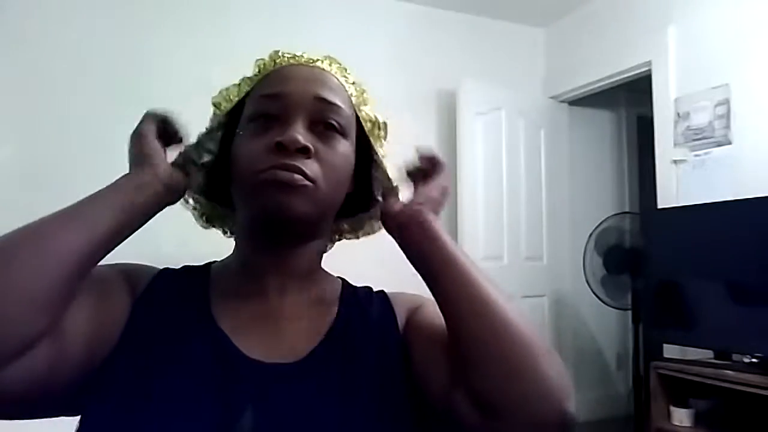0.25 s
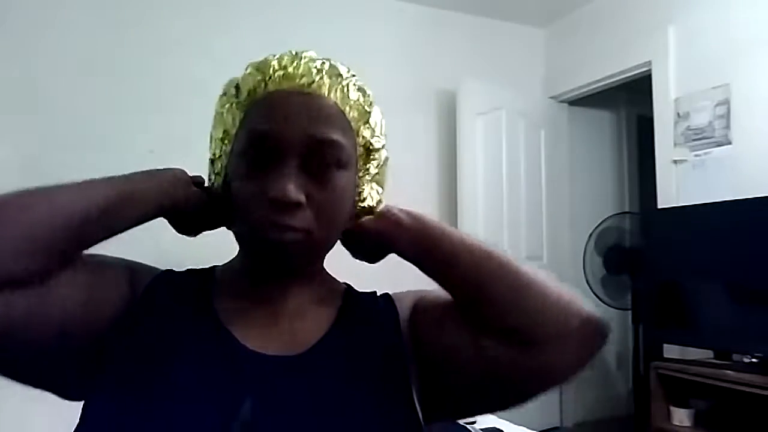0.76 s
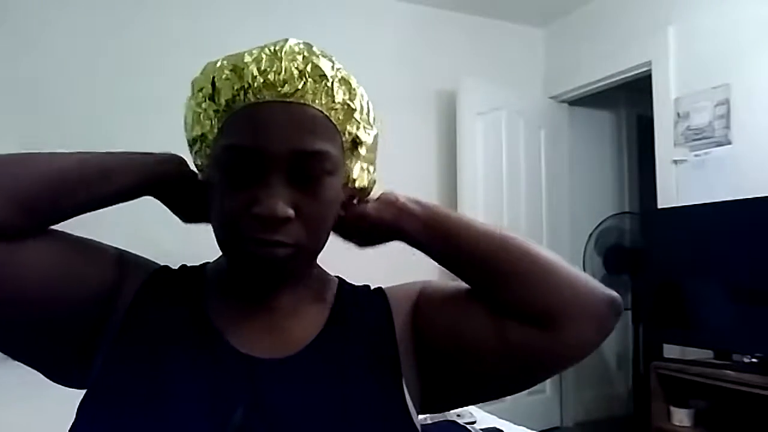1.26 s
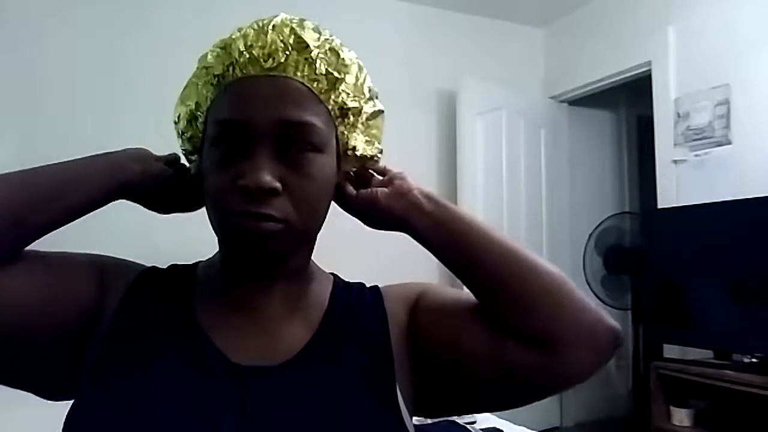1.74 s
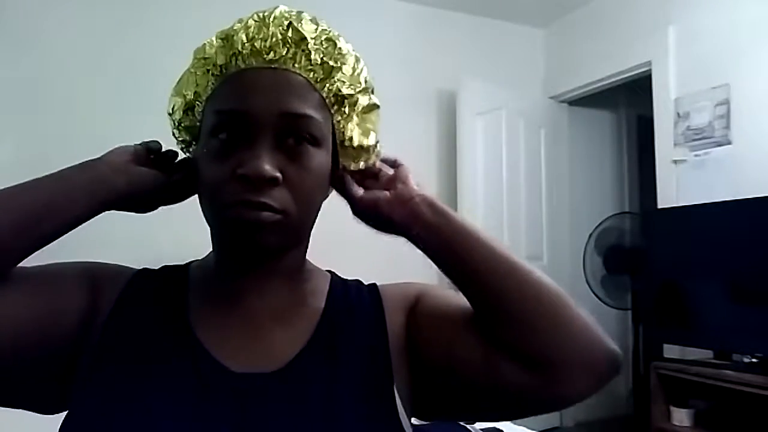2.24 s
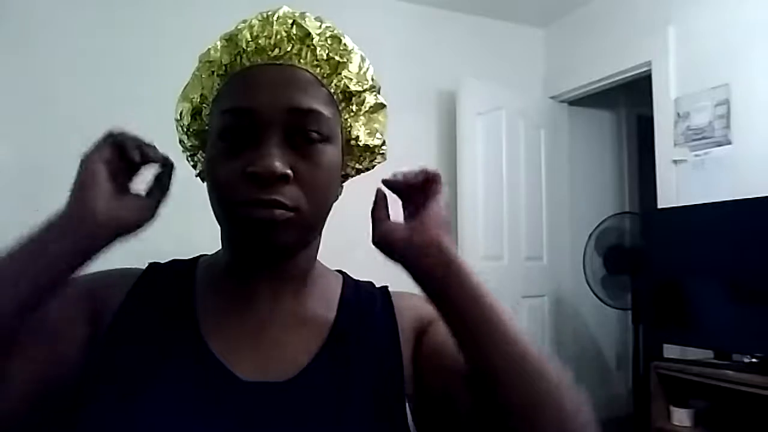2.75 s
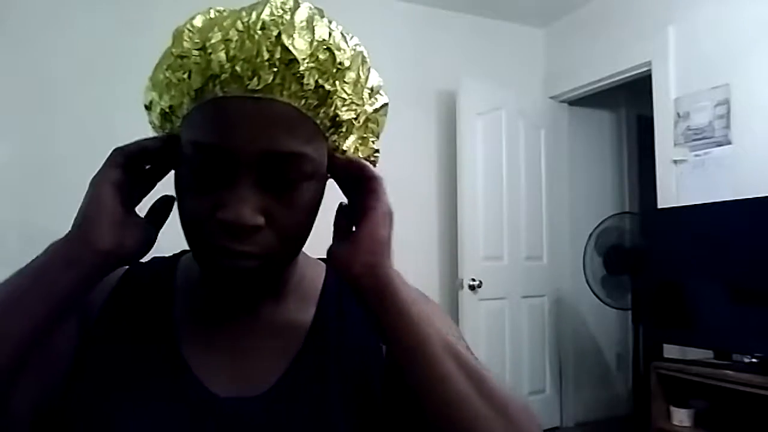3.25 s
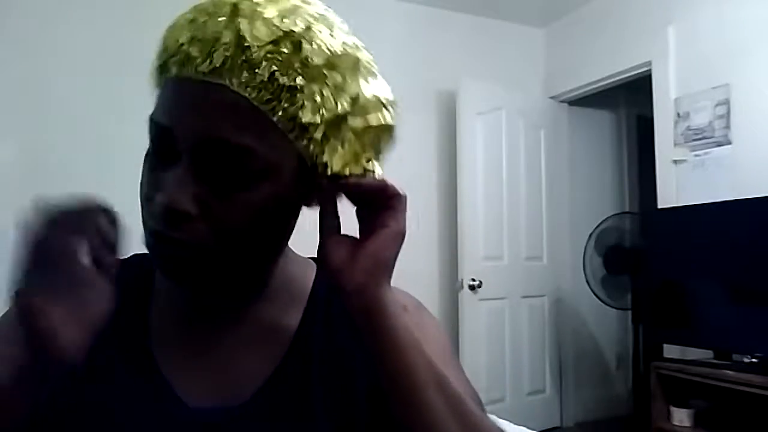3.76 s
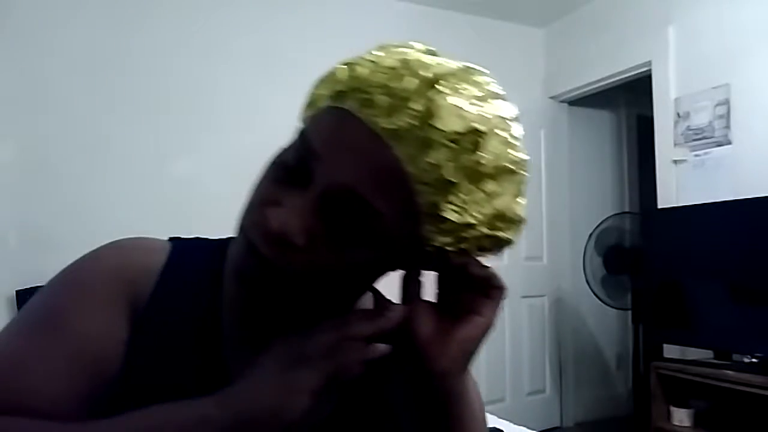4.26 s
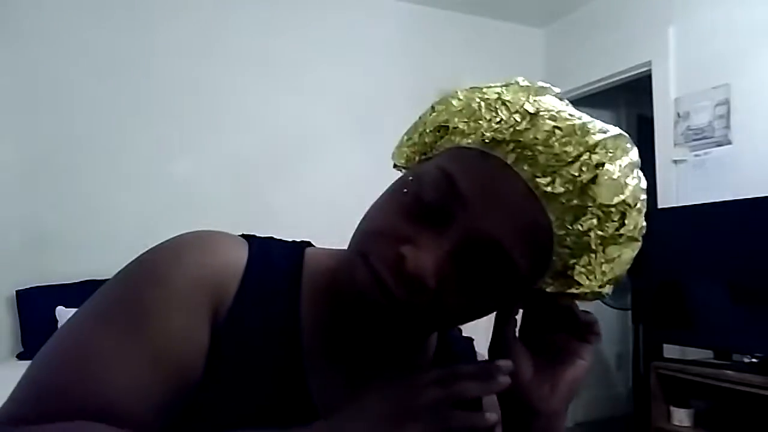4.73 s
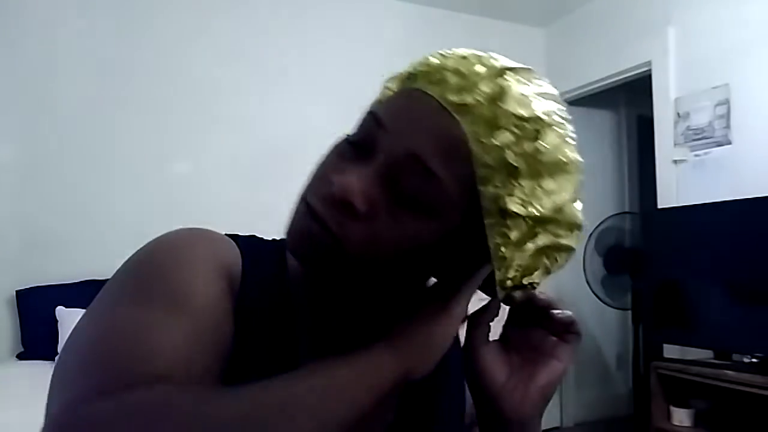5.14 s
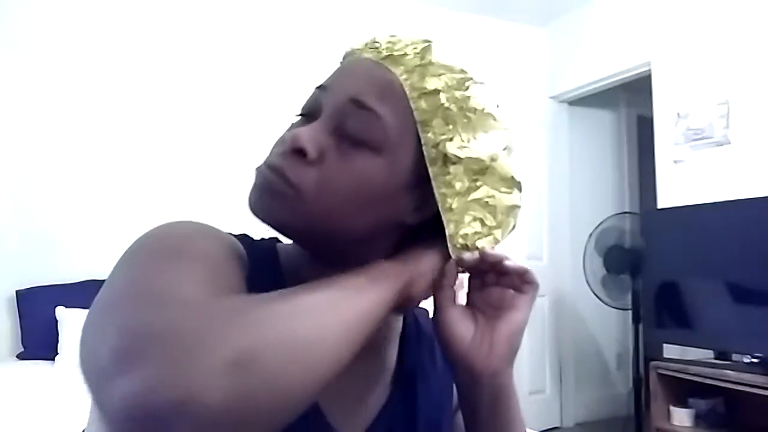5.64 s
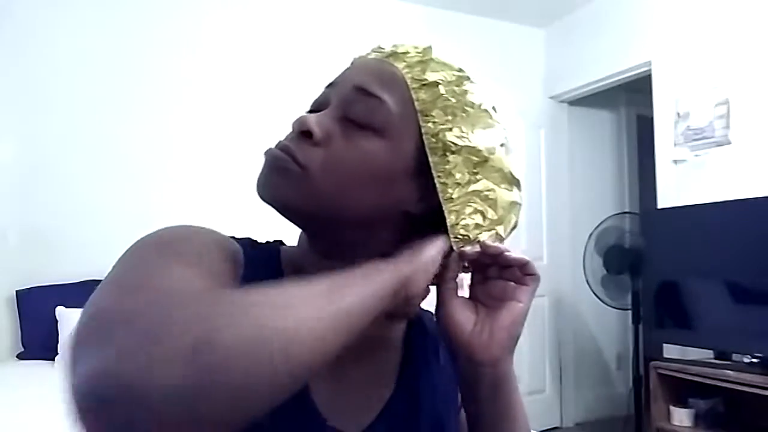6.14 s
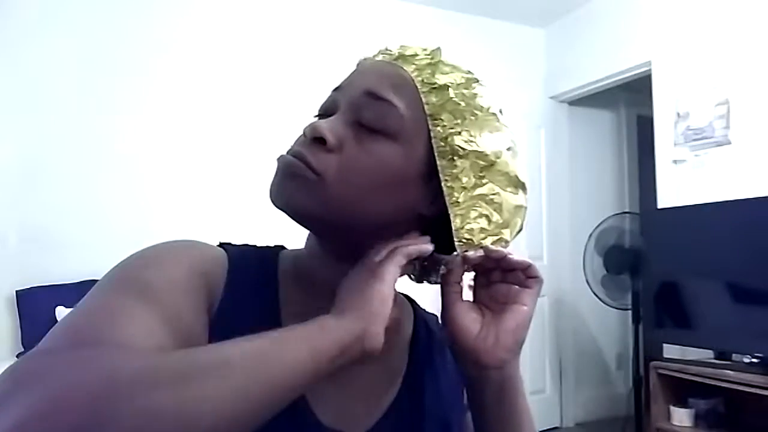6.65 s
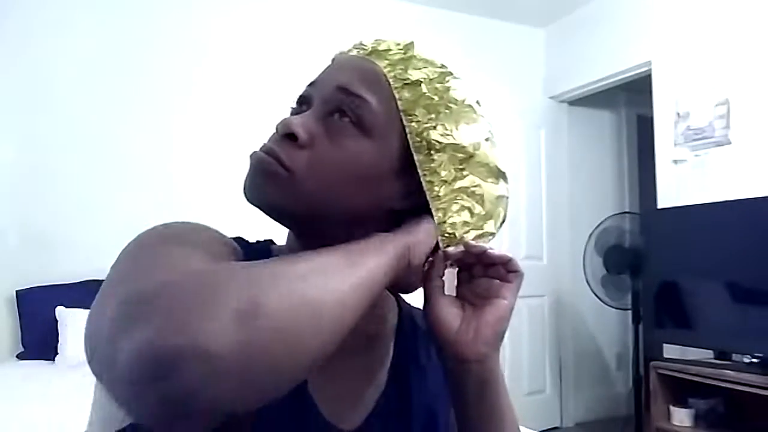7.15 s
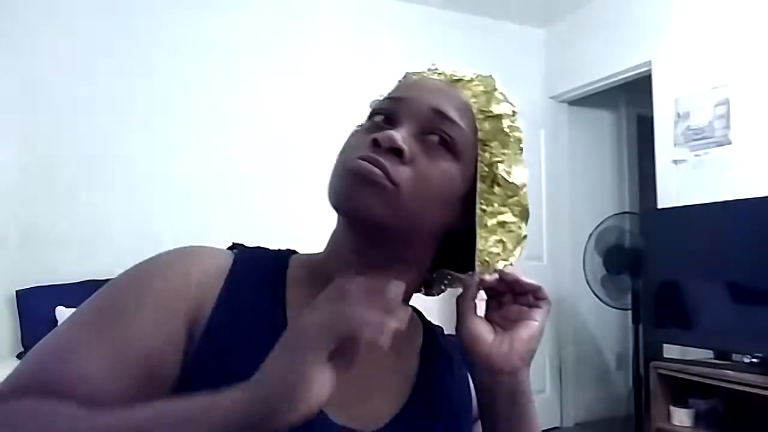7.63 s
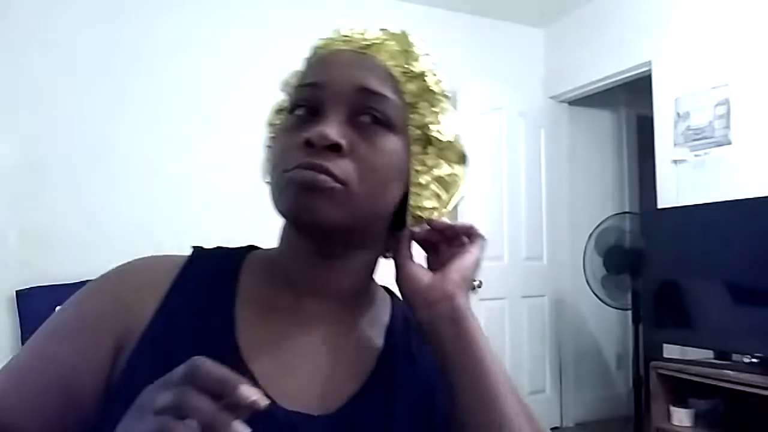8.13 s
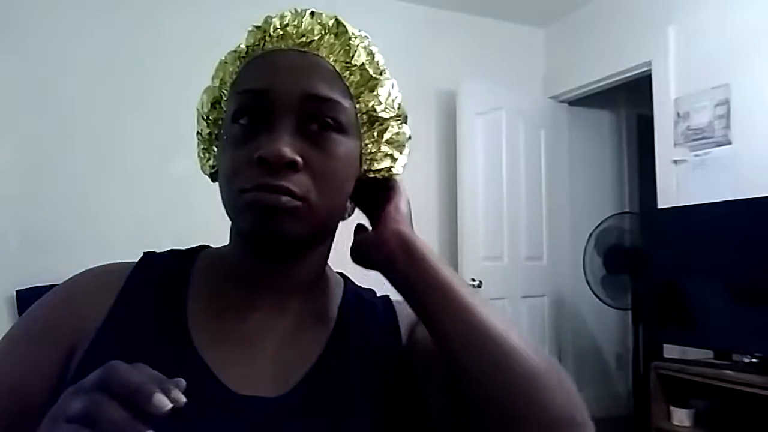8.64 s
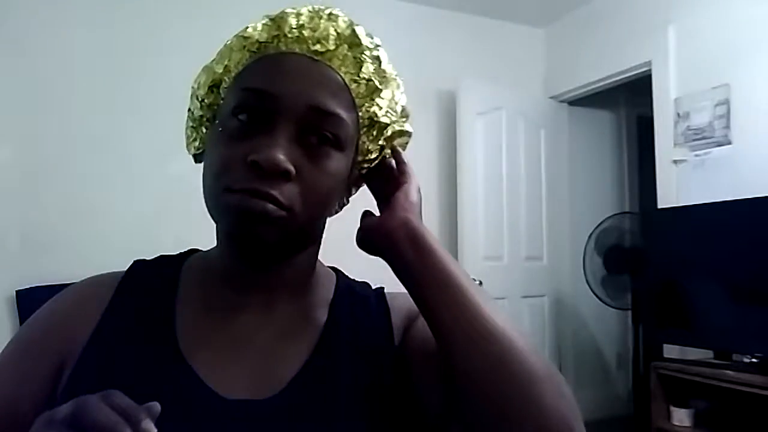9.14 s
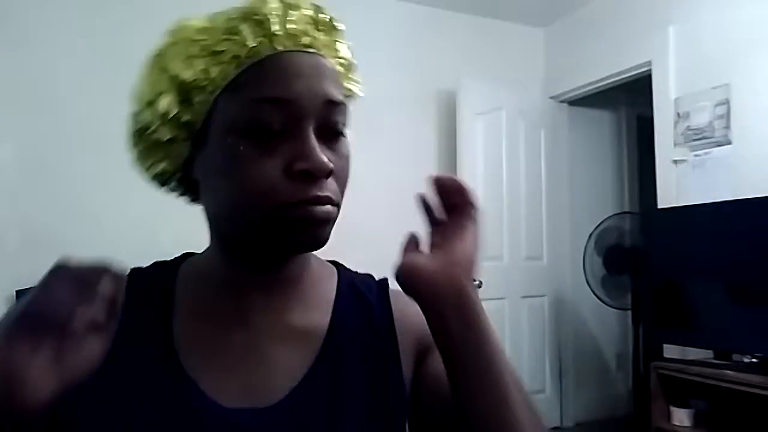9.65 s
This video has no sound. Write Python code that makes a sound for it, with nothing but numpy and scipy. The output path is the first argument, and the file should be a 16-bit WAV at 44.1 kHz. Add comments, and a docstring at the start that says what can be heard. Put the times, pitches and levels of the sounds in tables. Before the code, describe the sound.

Very close, bright crinkling of a foil-like cap in a small quiet bedroom. Dense rustling opens, thins to scattered ticks and almost stops, then single snaps return. A sharp loud crackle bursts midway, followed by sparse small ticks, a soft elastic slap and a last busy run of crunches. Dull rubbing of hair and skin, low rumble and faint hiss lie beneath.

```python
"""In a quiet bedroom, hands press and tuck a crinkly foil cap over hair, close to two microphones.
Creases buckle in swarms of tiny ticks and single sharp snaps, each a shaped burst of noise.
Film and fingers rub over hair as coloured noise; fingertips click, and the elastic hem slaps the skin as decaying tones.
A short room tail follows the handling, over a low rumble, a low hum, two thin whines and faint hiss."""
import sys
import numpy as np
from scipy import signal
from scipy.fft import rfft, irfft, next_fast_len
from scipy.io import wavfile
from scipy.ndimage import uniform_filter1d, map_coordinates

SR = 44100
rng = np.random.default_rng(int(sys.argv[2]) if len(sys.argv) > 2 else 0)


def master_out(mix):
    """Clip the mix to full scale and print it as 16-bit PCM to the path in sys.argv[1]."""
    frames = np.transpose(np.atleast_2d(mix))
    ceiling = np.clip(frames, -1, 1)
    pcm = np.round(ceiling * 32767).astype(np.int16)
    wavfile.write(sys.argv[1], SR, pcm)


N = 436149

# Tone colour of a buckling crease: (pitch_hz, relative level_db)
CREASE_COLOUR = [(300, -77.5), (1500, -54.5), (4000, -22), (5500, -21), (7800, -14), (8800, -11),
                 (11000, -6), (12400, 2.5), (13100, -5), (13700, -3), (14600, -10), (16000, -10.5)]
# Tone colour of film sliding over hair: (pitch_hz, relative level_db)
SLIDE_COLOUR = [(150, -11.5), (550, -13.5), (950, -0.5), (1400, -4), (2000, 0.5), (3300, 0.5), (4300, -5),
                (5400, -1), (7500, -11), (10000, -30), (16000, -43)]
# Dull tone colour of rubbed hair and skin: (pitch_hz, relative level_db)
HAIR_COLOUR = [(30, -43), (80, 9), (180, 1.5), (350, 4), (550, -0.5), (900, -3), (1400, -12.5), (2200, -12),
               (6000, -39)]


def amp(db):
    """Turn decibels into a gain."""
    return 10 ** (np.asarray(db) / 20)


def unit(x):
    """Scale x to an rms level of 1."""
    return x / np.sqrt(np.mean(x ** 2) + 1e-20)


def read_curve(points, hz):
    """Read a (pitch, value) table at any pitch, with pitch on a log axis."""
    point_hz, value = np.transpose(points)
    return np.interp(np.log(hz + 1), np.log(point_hz), value)


def filtered(x, response):
    """Multiply the spectrum of x by a response that depends on pitch."""
    size = next_fast_len(N + SR // 2)
    hz = np.fft.rfftfreq(size, 1 / SR)
    return irfft(rfft(x, size) * response(hz), size)[..., :N]


def noise(colour, alike):
    """Coloured stereo noise of rms 1; alike is the left-right correlation, from -1 to 1."""
    turn = np.arccos(np.clip(alike, -1, 1)) / 2
    mid, side = filtered(rng.standard_normal((2, N)), lambda hz: amp(read_curve(colour, hz)))
    left = np.cos(turn) * mid + np.sin(turn) * side
    right = np.cos(turn) * mid - np.sin(turn) * side
    return unit(np.array([left, right]))


def wobble(count):
    """A smooth random curve with count random points a second."""
    points = rng.standard_normal(N * count // SR + 4)
    return map_coordinates(points, [np.arange(N) * count / SR])


def gestures(start_s, length_s, level_db, attack_share, release_s):
    """Level in dB of hand movements: each builds up (the longer, the slower), holds and lets go."""
    power = np.full(N, 1e-10)  # a floor at -100 dB
    for start, held, level in zip(start_s, length_s, level_db):
        first = max(int(start * SR), 0)
        last = min(int((start + held + 6 * release_s) * SR), N)
        span = np.arange(first, last)
        t = span / SR - start
        build_up = np.clip(t / (attack_share * held), 0, 1)
        let_go = np.exp(-np.maximum(t - held, 0) / release_s)
        power[span] += (amp(level) * build_up * let_go) ** 2
    return 10 * np.log10(power)


def placed(start_s, gain, ticks):
    """Add up stereo ticks, each at its own start time and gain."""
    first = np.round(start_s * SR).astype(int)[:, None]
    index = np.maximum(first + np.arange(ticks.shape[2]), 0).ravel()
    sides = ticks.swapaxes(0, 1)
    return np.array([np.bincount(index, (gain[:, None] * side).ravel(), N)[:N] for side in sides])


def creases(count, colour, burst_s, flutter_db, ring_db, fold_hz=None):
    """Stereo ticks of unit energy: a click, its near echo, then wrinkle flutter, each with its own ringing."""
    size = 640  # samples in a tick
    t, hz = np.arange(size) / SR, np.fft.rfftfreq(size, 1 / SR)
    echo_s, echo_db = 0.0012, -5  # the bounce off the nearest surface
    click = np.exp(-t / 0.0003)
    echo = amp(echo_db) * np.exp(-((t - echo_s) / (burst_s / 2)) ** 2)
    flutter = amp(flutter_db - 60 * t / 0.042)
    shape = click + echo + flutter
    # random bumps in the spectrum: every facet rings at its own pitches
    facets = signal.resample(rng.standard_normal((count, 1, 28)), len(hz), axis=2)
    colour_db = read_curve(colour, hz) + ring_db * facets
    if fold_hz is not None:
        fold_ring_db, half_width_hz = 6, 650  # the fold's own resonance
        distance = (hz - fold_hz[:, None, None]) / half_width_hz
        colour_db = colour_db + fold_ring_db / (1 + distance ** 2)
    # minimum phase: the film rings only after it has buckled
    causal = np.r_[1, np.full(size // 2 - 1, 2), 1, np.zeros(size // 2 - 1)]
    cepstrum = irfft(np.log(amp(colour_db))) * causal
    bursts = rng.standard_normal((count, 2, size)) * shape
    ticks = irfft(rfft(bursts) * np.exp(rfft(cepstrum)))
    return ticks / np.sqrt(np.sum(ticks ** 2, axis=2, keepdims=True))


def swarm(level_db, rate, spread_db, colour, burst_s, ring_db):
    """Random ticks of unequal size, rate a second, that together follow an rms level."""
    due = np.cumsum(rate) / SR  # how many ticks should have sounded by now
    count = int(due[-1])
    chance = rng.random((count, 2))
    turn = np.minimum(np.arange(count) + 2 * chance[:, 0], count - 1)
    at = np.searchsorted(due, turn)
    # many small ticks and a few large ones
    size_db = spread_db * np.minimum(-np.log(1 - chance[:, 1]), 3)
    # where ticks are rarer, each carries more of the level
    gain = amp(level_db[at]) * unit(amp(size_db)) * np.sqrt(SR / rate[at])
    ticks = creases(count, colour, burst_s, flutter_db=-22, ring_db=ring_db)
    return placed(at / SR, gain, ticks)


def background():
    """Low rumble swells and sinks unevenly, mostly opposite at the two microphones, under faint room hiss."""
    # Rumble level: (time_s, level_db before a small random wobble)
    rumble_levels = [(0, -56), (0.2, -51), (0.75, -60.5), (1.15, -58.5), (1.5, -54.5), (2.1, -58),
                     (2.5, -60.5), (2.8, -69), (3.15, -68), (3.4, -53.5), (3.8, -62.5), (4.4, -56),
                     (5.3, -56), (5.9, -56), (6.1, -60.5), (6.5, -57.5), (6.88, -64.5), (7.2, -57.5),
                     (7.8, -58.5), (8.2, -55), (8.55, -60.5), (8.9, -65), (9.89, -53.5)]
    # Tone colour of the rumble: (pitch_hz, relative level_db)
    rumble_colour = [(20, -40.5), (33, -23), (42, -2), (55, 5), (80, -2), (140, -8), (250, -16),
                     (400, -21.5), (700, -59.5), (2000, -83.5), (8000, -60.5)]
    # Tone colour of the room hiss: (pitch_hz, relative level_db)
    hiss_colour = [(200, 13.5), (1000, -4), (2000, -18), (7000, -17), (10500, -1), (12400, 3.5),
                   (14000, -2), (16000, -13)]
    time_s, level_db = np.transpose(rumble_levels)
    rumble_db = np.interp(np.arange(N) / SR, time_s, level_db)
    rumble = noise(rumble_colour, alike=-0.85)
    swelling = amp(rumble_db + 1.5 * wobble(count=9)) * rumble
    return swelling + amp(-68.5) * noise(hiss_colour, alike=0)


def circuits():
    """The electronics add steady sine tones (a low hum and two thin whines) and an even hiss."""
    # Steady tones: (pitch_hz, left level_db, right level_db), as rms levels
    steady_tones = [(52.5, -81, -67.5), (4130, -87.5, -88), (14000, -85, -75.5)]
    t = np.arange(N) / SR
    side_phase = np.array([[0], [2.45]])  # radians, left and right
    out = amp(-72) * rng.standard_normal((2, N))
    for hz, left_db, right_db in steady_tones:
        level = amp([[left_db], [right_db]]) * np.sqrt(2)  # rms to peak
        out += level * np.sin(2 * np.pi * hz * t + side_phase)
    return out


def brush():
    """Fingers and arms rub hair and skin: soft, dull noise whose grip varies unevenly."""
    # Brushing movements: (start_s, length_s, level_db)
    brush_moves = [(-0.05, 0.19, -62.5), (0.17, 0.3, -58.5), (0.497, 0.39, -65.5), (0.753, 0.24, -61),
                   (1.03, 0.15, -58.5), (1.3, 0.34, -59), (2.011, 0.13, -61), (2.286, 0.12, -65.5),
                   (2.451, 0.11, -60), (2.556, 0.27, -70), (2.8, 0.54, -70.5), (3.267, 0.32, -63),
                   (3.829, 0.16, -64.5), (4.133, 0.23, -68), (4.503, 0.16, -71.5), (4.802, 0.1, -64.5),
                   (4.948, 0.23, -67.5), (5.217, .34, -61), (5.659, .15, -61.5), (5.838, 0.13, -66.5),
                   (6.136, 0.19, -61.5), (6.5, 0.22, -63.5), (7.017, 0.23, -66), (7.326, .14, -62.5),
                   (7.6, .17, -62.5), (7.877, 0.21, -67.5), (8.178, 0.25, -62.5), (8.65, 0.14, -60.5),
                   (8.89, 0.16, -58.5), (9.19, 0.14, -64), (9.462, 0.17, -64), (9.714, 0.18, -68)]
    level_db = gestures(*np.transpose(brush_moves), attack_share=0.17, release_s=0.091)
    grip = amp(3 * wobble(count=60))
    return amp(level_db) * unit(grip * noise(HAIR_COLOUR, alike=-0.13))


def folds(x, depth_db):
    """Air pockets under the film change shape, so narrow resonances come and go."""
    spectrum = signal.stft(x, nperseg=1024)[2]
    field = rng.standard_normal(spectrum.shape[1:])
    field = uniform_filter1d(field, size=7, axis=0)  # smooth over pitch
    field = uniform_filter1d(field, size=4, axis=1)  # smooth over time
    gain = unit(amp(depth_db * unit(field)))
    return signal.istft(spectrum * gain, nperseg=1024)[1][:, :N]


def crinkle():
    """Harder pressing buckles more creases a second; sliding film catches in duller ticks over a soft rasp."""
    # Presses, tucks and tugs at the cap: (start_s, length_s, crinkling level_db, sliding level_db),
    # both levels before the random give
    tuck_moves = [(-0.02, 0.1, -45, -63), (0.149, 0.13, -40.5, -56), (0.298, 0.061, -36.5, -48),
                  (0.373, 0.22, -35.5, -53.5), (0.577, .13, -33, -48.5), (0.719, 0.24, -34.5, -50),
                  (.945, 0.19, -41, -56.5), (1.15, 0.24, -49.5, -64), (1.349, 0.096, -38, -50.5),
                  (1.456, 0.093, -41, -56), (1.605, 0.099, -41, -55.5), (1.771, 0.057, -45, -66),
                  (1.884, 0.019, -34, -54), (2.028, 0.093, -43.5, -56), (2.134, 0.12, -48.5, -65),
                  (2.295, 0.11, -53, -67), (2.47, 0.038, -46, -70), (2.509, 0.031, -45.5, -59.5),
                  (2.565, 0.058, -48, -66), (2.764, 0.028, -60, -69.5), (3.287, 0.053, -55.5, -61),
                  (3.338, 0.29, -56, -66), (3.847, 0.14, -44.5, -57), (4.016, 0.12, -48.5, -63),
                  (4.217, 0.028, -43.5, -57), (4.286, 0.2, -64, -76), (4.478, 0.17, -64, -69.5),
                  (4.805, 0.068, -54, -61), (5.137, 0.23, -60, -67), (5.374, 0.16, -36, -47.5),
                  (5.631, 0.13, -61, -68), (5.727, 0.2, -49.5, -62.5), (6.172, 0.2, -57, -66.5),
                  (6.362, .1, -46, -54), (6.522, .15, -49.5, -58), (6.795, 0.023, -55, -75),
                  (7.005, 0.083, -56, -66.5), (7.08, 0.097, -51.5, -59), (7.212, 0.062, -62.5, -74),
                  (7.33, 0.13, -51, -60.5), (7.501, 0.21, -64, -75), (7.714, 0.057, -45.5, -55),
                  (7.798, 0.14, -40, -53.5), (8.039, 0.12, -63.5, -72.5), (8.176, 0.16, -54.5, -66.5),
                  (8.631, 0.071, -52, -69.5), (8.687, 0.079, -35.5, -53), (8.801, 0.16, -40.5, -55),
                  (8.962, 0.15, -40, -52), (9.119, 0.064, -46.5, -59), (9.21, 0.12, -46, -56.5),
                  (9.42, 0.1, -55.5, -67.5), (9.533, 0.085, -38, -51.5), (9.772, 0.14, -55, -70.5)]
    start_s, length_s, *levels = np.transpose(tuck_moves)
    crinkle_db, slide_db = (
        gestures(start_s, length_s, db, attack_share=0.2, release_s=0.02) for db in levels)
    # the film sticks and gives, so ticks arrive in clumps
    give = wobble(count=45)
    bright_db = crinkle_db + 1.7 * give
    catch_db = slide_db + 1.2 * give + 1.5 * wobble(count=40)
    # ticks a second grow with the level
    bright_rate = 440 * amp(0.55 * np.clip(bright_db + 41.5, -25, 9))
    catch_rate = 380 * amp(0.55 * np.clip(catch_db + 52, -20, 8))
    bright = swarm(bright_db, bright_rate, spread_db=3.8, colour=CREASE_COLOUR, burst_s=0.0008, ring_db=3)
    catches = swarm(catch_db, catch_rate, spread_db=3.2, colour=SLIDE_COLOUR, burst_s=0.0016, ring_db=6)
    # a soft rasp lies under each kind of tick
    bright += amp(bright_db - 11) * folds(noise(CREASE_COLOUR, alike=0), depth_db=3)
    catches += amp(catch_db - 7) * folds(noise(SLIDE_COLOUR, alike=0), depth_db=3.5)
    return bright + catches


def desk(x):
    """A bounce off the desk combs the sound; its delay drifts slowly."""
    delay_s, drift_s, bounce_db = 0.00075, 0.00012, -9
    at = np.arange(N) - SR * (delay_s + drift_s * wobble(count=2))
    bounce = np.array([map_coordinates(side, [at]) for side in x])
    return (x + amp(bounce_db) * bounce) / np.sqrt(1 + amp(bounce_db) ** 2)


def bedroom(x, wet_db):
    """Walls send both sides of the cap to each microphone in a diffuse tail of decaying noise."""
    # How long the room rings: (pitch_hz, time to fall by 60 dB in s)
    room_decay = [(200, 0.11), (1500, 0.39), (5000, 0.36), (12000, 0.31), (16000, 0.063)]
    step = SR // 8  # the tail is drawn afresh eight times a second
    out = np.zeros((2, N + SR))
    for start in range(0, N, step):
        hz, t, spectrum = signal.stft(rng.standard_normal((2, 2, SR // 2)), SR, nperseg=256)
        build_up = 1 - np.exp(-t / 0.005)
        decay = amp(-60 * t / read_curve(room_decay, hz)[:, None])
        tail = signal.istft(spectrum * decay * build_up, SR, nperseg=256)[1]
        tail = tail / np.linalg.norm(tail[0])
        piece = x[None, :, start:start + step]
        answer = signal.fftconvolve(piece, tail, axes=2).sum(axis=1)
        out[:, start:start + answer.shape[1]] += answer
    return amp(wet_db) * out[:, :N]


def snaps():
    """Large creases flip at once, ring with their fold, and set off two neighbouring wrinkles each."""
    # Louder creases snapping through: (start_s, crack level_db,
    # fold body level_db relative to the crack, fold pitch_hz)
    snap_events = [(0.072, -35.5, -5.5, 6800), (0.1202, -33, -19, 1300), (0.148, -29.5, -19, 7100),
                   (0.176, -24.5, -9, 5600), (0.346, -22, -18.5, 2700), (0.4755, -31.5, -7, 2100),
                   (0.5249, -29, -10, 2299), (0.5652, -30.5, -21, 3000), (0.6067, -26.5, -26, 2700),
                   (0.6295, -29.5, -29, 2500), (0.6507, -26, -24, 2600), (0.6673, -23, -25, 2700),
                   (0.732, -23.5, -27.5, 2600), (0.803, -26.5, -37.0, 1300), (0.8322, -21.5, -24, 2307),
                   (1.036, -35.5, -6, 1500), (1.0673, -32.5, -32, 3002), (1.0769, -38, -24, 3000),
                   (1.1545, -29, -11, 3800), (1.27, -34.5, -28, 7500), (1.2996, -30, -27, 5490),
                   (1.3347, -30, -23, 1302), (1.5794, -25.5, -11.5, 6200), (1.6291, -21.5, -12, 5070),
                   (1.6768, -34.5, -16, 5195), (1.7192, -27, -10.5, 5270), (1.7655, -28.5, -34.5, 1801),
                   (1.7927, -24.5, -23, 6240), (1.8689, -33, -11, 6810), (1.8767, -29.5, -33, 7300),
                   (1.89, -26.5, -18, 5196), (1.894, -26, -18, 7800), (1.918, -29, -11.5, 5300),
                   (1.944, -27, -18, 5990), (1.9769, -24.5, -16, 5910), (2.0751, -30, -6.5, 5206),
                   (2.0992, -32, -20, 1302), (2.169, -33.5, -7, 4900), (2.2579, -35.5, -13.5, 6760),
                   (2.2865, -30, -13.5, 5100), (2.3194, -29, -30.0, 7640), (2.4737, -33, -25, 5196),
                   (2.5211, -26, -35, 7470), (2.5926, -45, -26, 5505), (2.981, -34, -41, 1398),
                   (3.3044, -40, -4, 1305), (3.7962, -40.5, -32.5, 7780), (3.843, -38.5, -12, 2996),
                   (3.847, -24, -18, 1599), (3.8839, -19, -14, 1700), (3.9279, -24, -16.0, 5363),
                   (3.9363, -29.5, -6, 3990), (3.9822, -24, -15, 7800), (3.991, -29.5, -8, 2312),
                   (4.0164, -31, -4, 7700), (4.0342, -24, -9, 5594), (4.0518, -24.5, -15, 1502),
                   (4.0945, -26, -16, 1498), (4.1174, -24.5, -12, 7034), (4.23, -28.5, -6, 7030),
                   (4.3185, -35, -14, 7850), (4.3313, -37.5, -20, 6000), (4.405, -30, -40, 2585),
                   (4.4872, -44, -5, 3317), (4.5113, -30.5, -3, 4000), (4.5331, -38, -18, 1894),
                   (4.6223, -29.5, -34, 5720), (4.709, -38.5, -18, 5920), (4.7393, -34, -23, 6430),
                   (4.7966, -27.5, -18, 5760), (4.8024, -34.5, -13.5, 3000), (4.8124, -27.5, -14, 4300),
                   (4.8265, -40, -10, 2400), (4.8512, -28.5, -21, 5540), (4.8848, -39, -7.5, 6310),
                   (4.918, -21, -15, 7890), (4.9885, -32.5, -8, 5940), (5.008, -37, -14, 3300),
                   (5.0666, -29.5, -15, 2405), (5.1381, -26, -13.5, 6010), (5.1593, -38.5, -4, 2600),
                   (5.1765, -36, -16, 3800), (5.1845, -26.5, -9.5, 2494), (5.22, -24.5, -16, 7810),
                   (5.3734, -23, -7, 2010), (5.379, -26, -24, 2504), (5.3923, -19.5, -28, 1699),
                   (5.402, -23, -9, 7824), (5.413, -20, -22, 3590), (5.4205, -18.5, -30.5, 2903),
                   (5.4309, -17.5, -34, 2093), (5.454, -19, -27, 4776), (5.4726, -8.5, -15, 1900),
                   (5.4896, -13, -14, 4700), (5.4945, -15, -22, 2800), (5.5136, -19, -11.5, 1900),
                   (5.5175, -12.5, -19, 2800), (5.5853, -25.5, -10.5, 7314), (5.7775, -35, -10, 5497),
                   (5.8038, -32, -19, 1296), (5.8433, -37.5, -4, 2986), (5.9002, -38, -18, 5510),
                   (6.0825, -26.5, -21, 7770), (6.3733, -30, -7.5, 3805), (6.3855, -33, -17, 4196),
                   (6.521, -31.5, -8, 1401), (6.545, -24.5, -21, 7770), (7.012, -35.5, -8.5, 1790),
                   (7.0573, -33, -4.5, 1800), (7.132, -33, -2, 5640), (7.309, -41, -17.0, 7810),
                   (7.333, -34, -20, 1800), (7.3417, -28.5, -17, 5376), (7.685, -32.0, -11.5, 3700),
                   (7.7338, -32, -13, 3003), (7.771, -29, -12, 1295), (7.8025, -28, -6, 1807),
                   (7.8243, -30.5, -19, 2314), (7.847, -38.5, 0, 2404), (7.8744, -22, -14, 1994),
                   (7.9365, -21.5, -20, 3312), (8.0487, -34, -24, 1309), (8.1883, -38.5, -12.0, 2905),
                   (8.218, -27.5, -25, 5590), (8.3022, -34, -7, 7600), (8.3266, -19, -14, 2280),
                   (8.6385, -31.5, -32, 7840), (8.7031, -14, -18, 7320), (8.7149, -25, -16, 1299),
                   (8.7405, -22.5, -12, 1692), (8.7658, -26, -11, 1700), (8.863, -26, -25, 1288),
                   (8.872, -24, -28, 1400), (8.902, -23, -8.5, 5205), (8.9214, -26, -7, 1400),
                   (8.9906, -22, -17, 7070), (9.039, -26.5, -7, 1700), (9.0453, -20.5, -6.5, 6017),
                   (9.0726, -20, -17, 1597), (9.1664, -30.5, -11, 1714), (9.1981, -31.5, -15, 5067),
                   (9.2254, -25.5, -9.5, 4980), (9.233, -29, -12, 5700), (9.2521, -24.5, -7.5, 5135),
                   (9.311, -23.5, -9, 3110), (9.3819, -36.5, -7, 3490), (9.4305, -28.0, -9, 5984),
                   (9.5094, -33.5, -4, 6030), (9.5295, -22.5, -23.0, 4796), (9.5397, -30, -5.5, 5254),
                   (9.5964, -17, -17, 2685), (9.6094, -25.5, -3.5, 2880)]
    # Tone colour of the fold under the crack: (pitch_hz, relative level_db)
    fold_colour = [(200, -21.5), (700, -4.5), (1500, 1), (3200, 2.5), (4200, 8), (5800, 9.5), (8000, 6),
                   (16000, -18)]
    crack_s = 0.0019  # length that sets the crack's echo and energy
    after_wait_s, after_db = 0.0048, -8  # mean wait for each next wrinkle; level relative to the crack
    start_s, level_db, body_db, fold_hz = np.transpose(snap_events)
    count = len(start_s)
    crack = creases(count, CREASE_COLOUR, burst_s=crack_s, flutter_db=-20, ring_db=1.5)
    body = creases(count, fold_colour, burst_s=0.0024, flutter_db=-18, ring_db=3, fold_hz=fold_hz)
    gain = amp(level_db) * np.sqrt(SR * crack_s / 2)  # the energy of a burst at that level
    cracks = placed(start_s, gain, crack)
    waits = np.cumsum(rng.exponential(after_wait_s, (count, 2)), axis=1)
    for late_s in start_s + waits.T:
        wrinkle = creases(count, CREASE_COLOUR, burst_s=0.001, flutter_db=-22, ring_db=4)
        cracks += placed(late_s, gain * amp(after_db), wrinkle)
    return cracks, placed(start_s, gain * amp(body_db), body)


def taps():
    """Fingertips meet the hem in small, dull clicks: short sine tones with an unsteady phase."""
    # Fingertip clicks: (start_s, level_db, pitch_hz)
    tap_events = [(4.865, -51, 1402), (6.041, -39.5, 2850), (8.767, -29, 1680)]
    start_s, level_db, pitch_hz = np.transpose(tap_events)
    t = np.arange(SR // 50) / SR
    jitter = 0.43 * np.cumsum(rng.standard_normal((len(start_s), 2, len(t))), axis=2)
    phase = 2 * np.pi * pitch_hz[:, None, None] * t + jitter
    shape = amp(-60 * t / 0.011) * (1 - np.exp(-t / 0.00053))
    return placed(start_s, amp(level_db), np.sin(phase) * shape)


def hem():
    """The elastic lands on the neck with a dull, quickly damped slap and thud; its gathered film crunches."""
    # Two contacts heard as one slap: (start_s, level_db)
    slap_contacts = [(8.3257, -34.5), (8.3281, -37.5)]
    # What hem and skin ring with: (pitch_hz, relative level_db, time to fall by 60 dB in s)
    hem_ringing = [(155, -4, 0.055), (373, 9, 0.036), (537, 12, 0.022), (732, -6, 0.018), (896, -4, 0.017),
                   (1610, -11, 0.023), (2180, -20, 0.011)]
    t = np.arange(SR // 4) / SR
    ring = sum(amp(db - 60 * t / t60) * np.sin(2 * np.pi * hz * t) for hz, db, t60 in hem_ringing)
    ring = ring * (1 - np.exp(-t / 0.0013))  # a soft onset
    slap = np.zeros(N)
    for start_s, level_db in slap_contacts:
        slap[round(start_s * SR):][:len(t)] += amp(level_db) * ring
    # crunch and thud swell into the contact and die away after it
    since = np.arange(N) / SR - slap_contacts[0][0]
    gathers = amp(-60 * np.maximum(since / 0.064, -since / 0.025))
    crisp = amp(-23.5) * noise(CREASE_COLOUR, alike=0)
    sliding = amp(-37) * noise(SLIDE_COLOUR, alike=0)
    thud_level = amp(-36.5 - 60 * np.maximum(since / 0.079, -since / 0.012))
    thud = thud_level * noise(HAIR_COLOUR, alike=0)
    late_left = np.roll(slap, SR // 1000)  # the left side hears the slap 1 ms later
    return np.array([late_left, slap]) + thud, gathers * (crisp + sliding)


def scene():
    """The cap and the hands in the room."""
    slap, crunch = hem()
    rustle = desk(crinkle()) + taps() + brush() + crunch
    cracks, bodies = snaps()
    # the snaps are heard drier than the rustle, and the slap much drier
    to_walls = rustle + amp(-2.5) * cracks + amp(-2.5) * bodies + amp(-15) * slap
    room = bedroom(to_walls, wet_db=-5.3)
    return rustle + cracks + bodies + slap + room + background()


def record(dry):
    """Each microphone adds its colour and circuit noise; deepest bass and everything above a limit are cut."""
    # The left microphone is much the brighter: (pitch_hz, left minus right level_db)
    side_balance = [(100, .5), (350, 3), (650, -1), (1200, 8), (2000, 5), (3200, 0), (3750, .5), (4100, 6),
                    (4600, 0), (7500, .5), (8800, 7), (9900, 11), (11000, 21), (12400, 25), (13300, 25),
                    (14200, 19), (15500, 19)]
    low_hz, top_hz = 30, 15850

    def colour(hz):
        """Share the left-right ratio out so that the power of both sides together stays the same."""
        ratio = amp(read_curve(side_balance, hz))
        return np.array([ratio, np.ones_like(ratio)]) * np.sqrt(2 / (1 + ratio ** 2))

    def band(hz):
        """Fade out the deepest bass and stop sharply at the top."""
        low_cut = hz ** 4 / (hz ** 4 + low_hz ** 4)
        return low_cut * (hz < top_hz)

    return filtered(filtered(dry, colour) + circuits(), band)


dry = scene()
out = record(dry)
master_out(out)
```